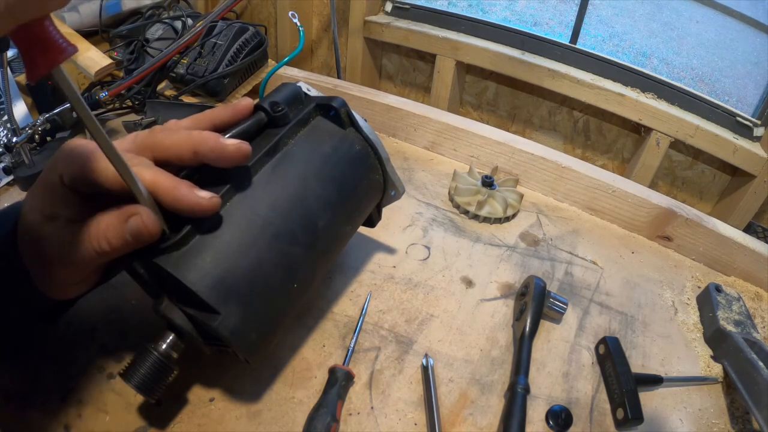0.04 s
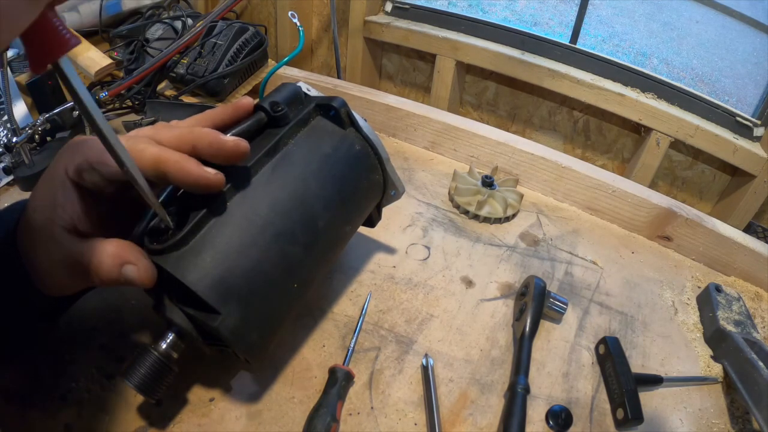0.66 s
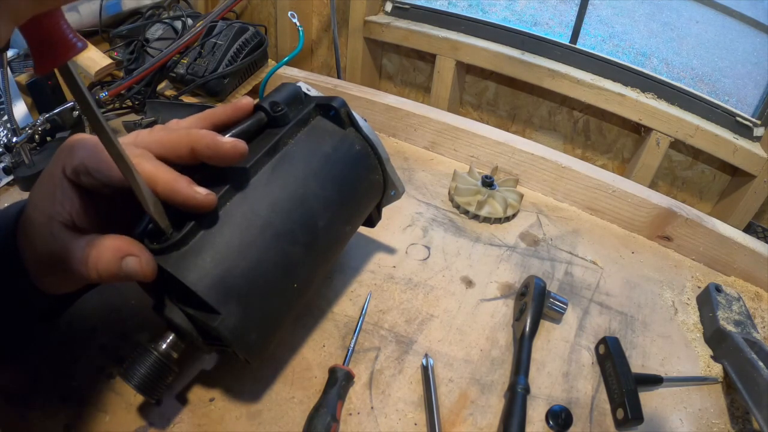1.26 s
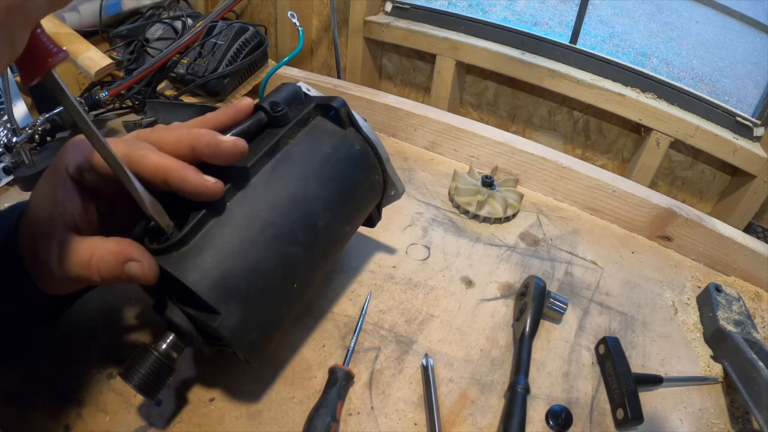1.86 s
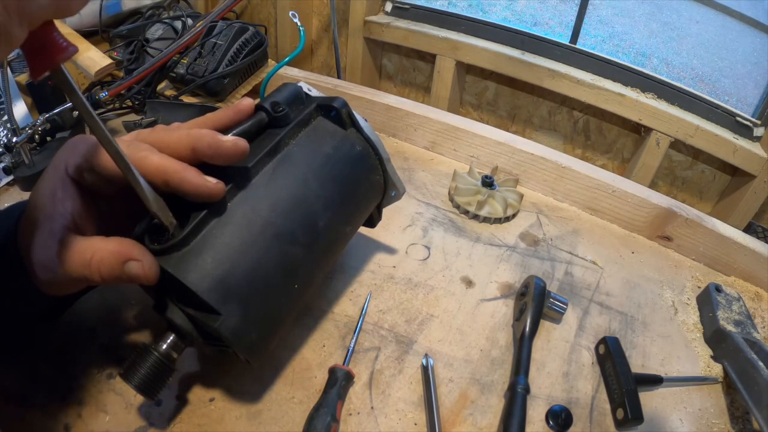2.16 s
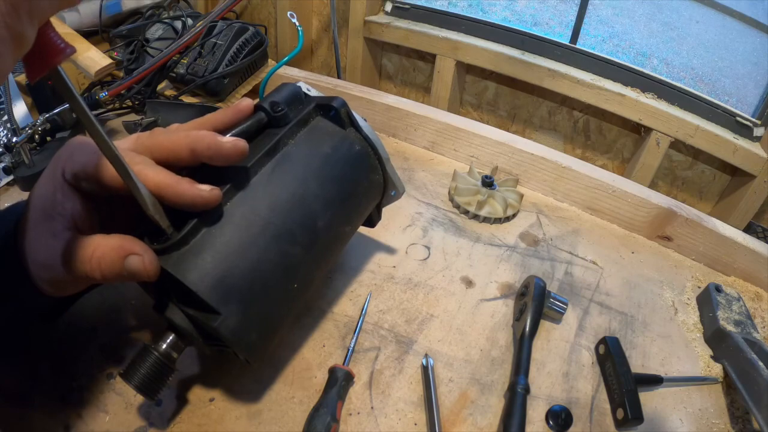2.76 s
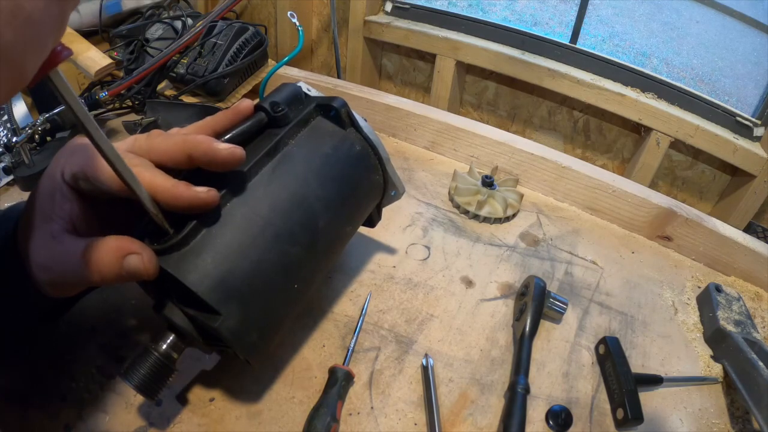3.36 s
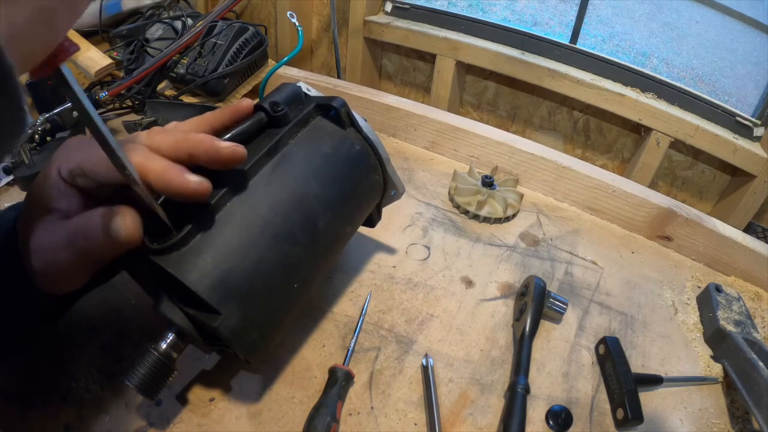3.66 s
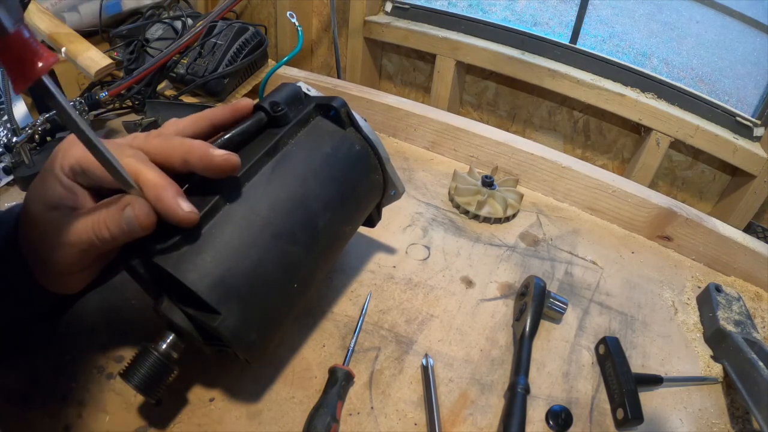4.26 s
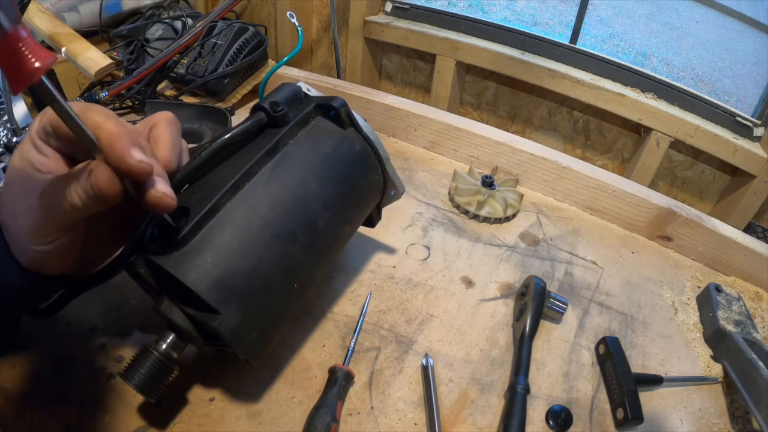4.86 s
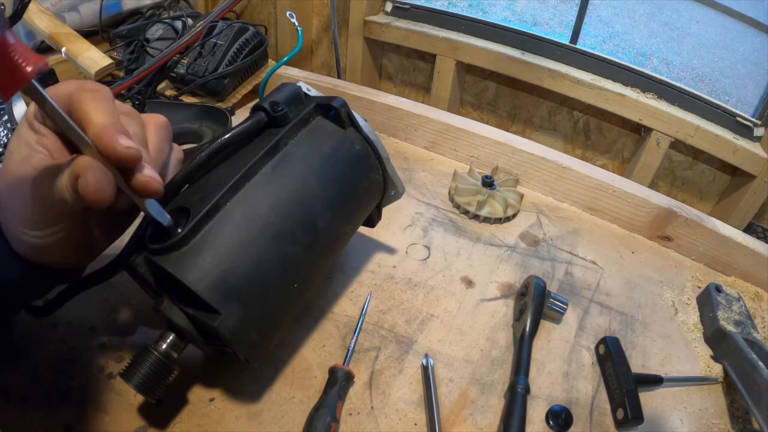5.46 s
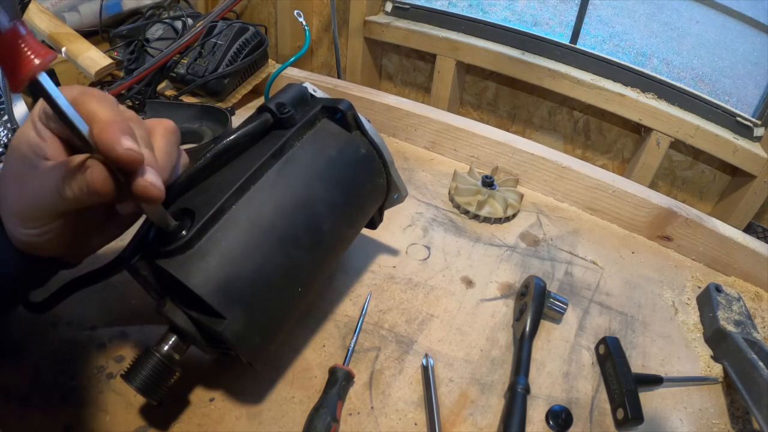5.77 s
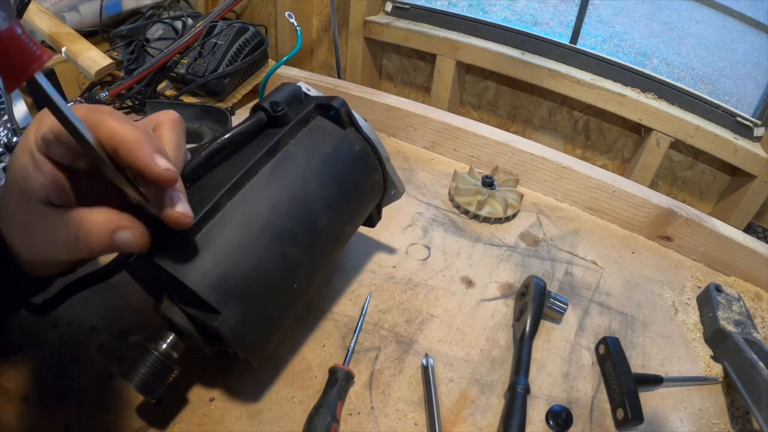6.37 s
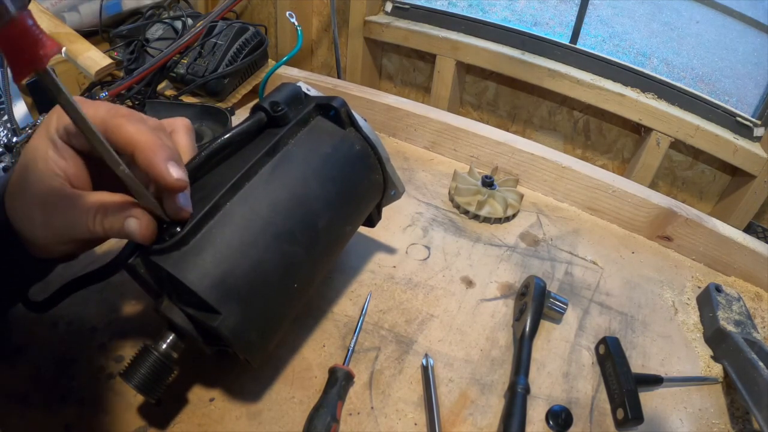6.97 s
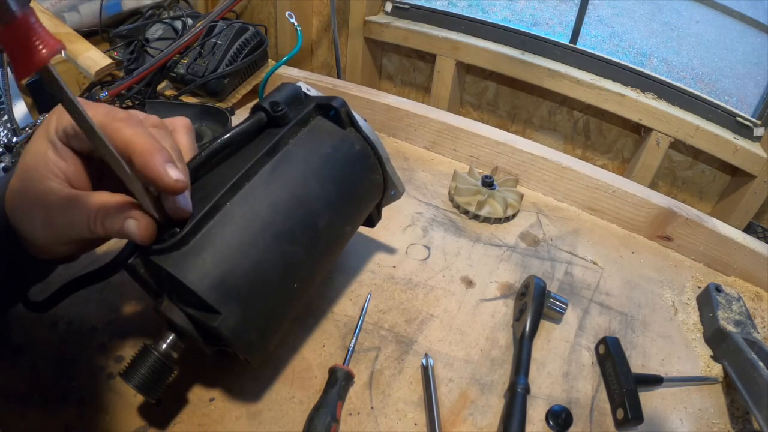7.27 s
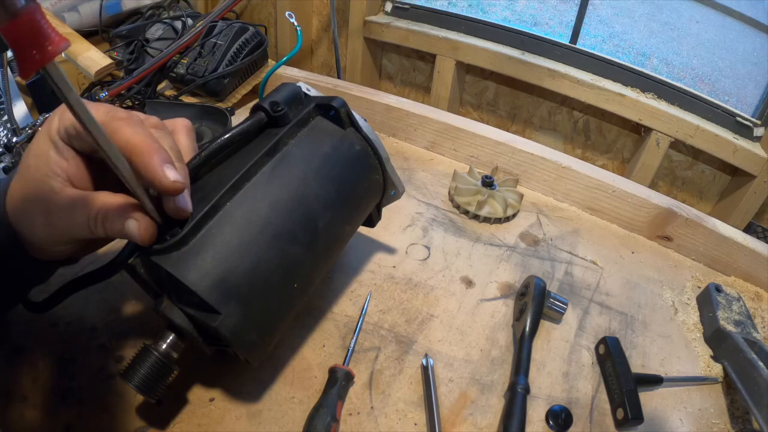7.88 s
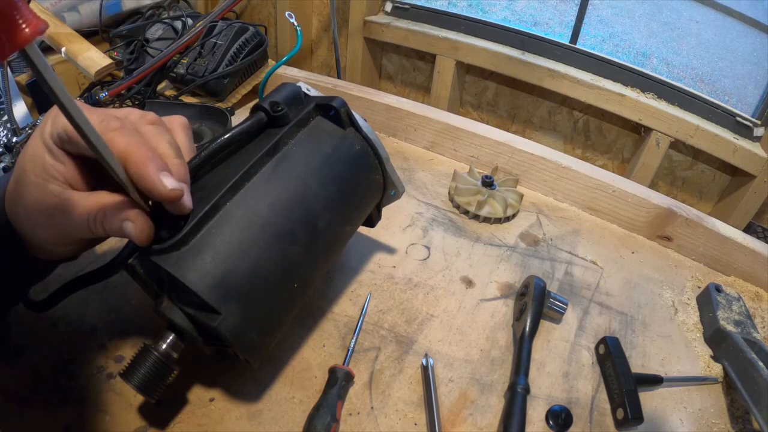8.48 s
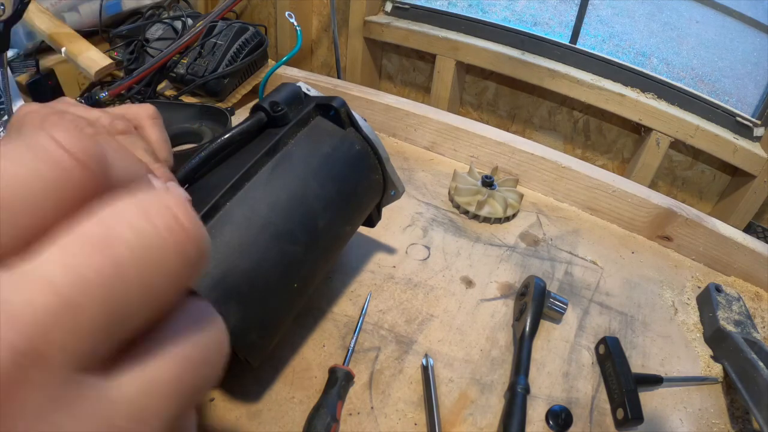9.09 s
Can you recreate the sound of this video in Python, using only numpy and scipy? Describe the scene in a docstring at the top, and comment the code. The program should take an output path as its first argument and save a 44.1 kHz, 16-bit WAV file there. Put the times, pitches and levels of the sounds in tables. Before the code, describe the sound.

A flat screwdriver turns a plastic cap in a motor casing, heard close by in a small, quiet shed. At 0.3 seconds the blade clicks sharply and the heavy motor thumps on the wooden bench. More clicks and dull bumps follow around 1.2 seconds, then a brief low groan of the casing on wood at 1.5. Clicks near 2 and 2.5 seconds surround a faint, thin squeak. The strongest click, with a low knock, lands at about 3.3 seconds. From 4 seconds the cap scrapes in short, dry, uneven strokes mixed with small clicks, busiest between 5 and 6, and it grinds briefly at 5.8 as it binds. A soft hand thud and bench rumble come at about 6.4 seconds. Separate scrapes and clicks continue roughly three times a second, with light bumps, growing fainter toward the end at about 9 seconds.

```python
"""A flat screwdriver works a plastic cap round in the casing of a motor lying on a wooden bench.
The blade clicks in and out of its slot, ringing cap, steel and casing. Tiny slips make the cap scrape
in short strokes; it squeaks once by stick-slip and grinds once where it binds. The hands jolt, bump and
lean on the heavy motor, which rumbles and groans on the wood. Heard close by in a small, quiet shed."""
import sys
import numpy as np
from scipy import signal
from scipy.fft import rfft, irfft
from scipy.io import wavfile
from scipy.ndimage import uniform_filter1d

SR = 44100
rng = np.random.default_rng(int(sys.argv[2]) if len(sys.argv) > 2 else 0)


def bounce(signal):
    """Save signal as a 16-bit WAV file at the path given by the first command-line argument."""
    frames = np.transpose(np.atleast_2d(signal))
    limited = np.clip(frames, -1, 1)
    pcm = np.round(limited * 32767).astype(np.int16)
    wavfile.write(sys.argv[1], SR, pcm)


N = 402633

# Modes of plastic cap, steel blade and motor casing. Each row: frequency in Hz, width in Hz, gain in dB.
CAP_RESONANCES = [(1061.6, 67, 19.5), (1182, 64, 6), (1370, 110, -0.5), (1979, 103, 10), (2490, 110, 4)]
BLADE_RESONANCES = [(2808, 240, 4.5), (4086, 180, 6), (4650, 200, 2.5), (5950, 440, 5.5), (7680, 160, 11)]
CASING_RESONANCES = [(169.3, 16, -3), (228, 23, 3.5), (292.3, 44, -5.5), (397.2, 46.3, -7.5)]
STROKE_RISE_DB_PER_S, STROKE_FALL_DB_PER_S = 599, 337.5


def from_db(db):
    """Decibels to gain."""
    return 10 ** (np.asarray(db) / 20)


def unit_rms(x):
    """x scaled to rms 1."""
    return x / np.sqrt(np.mean(x ** 2) + 1e-20)


def levelled(pair, window_s):
    """Mid/side pair with the mid's running rms held near 1."""
    size = int(window_s * SR)
    power = uniform_filter1d(uniform_filter1d(pair[0] ** 2, size), size)
    return pair / np.sqrt(np.abs(power) + 1e-20)


def tracks(rows):
    """Rows of time in seconds and values, interpolated to one track per value."""
    times_s, *columns = np.transpose(rows)
    return [np.interp(np.arange(N) / SR, times_s, column) for column in columns]


def drift(knots_per_s):
    """Random wander of rms 1."""
    knots = rng.standard_normal(N)
    return unit_rms(np.interp(np.arange(N) / SR * knots_per_s, np.arange(N), knots))


def swell(start_s, hold_s, rise_db_per_s=STROKE_RISE_DB_PER_S, fall_db_per_s=STROKE_FALL_DB_PER_S,
          fade_db=0):
    """Envelope: rises to 1 at start_s, loses fade_db over hold_s, then dies away."""
    lead_s, tail_s = 80 / rise_db_per_s, 80 / fall_db_per_s  # 80 dB each way
    span = np.arange(max(int((start_s - lead_s) * SR), 0), min(int((start_s + hold_s + tail_s) * SR), N))
    age_s = span / SR - start_s
    rise_db = rise_db_per_s * np.minimum(age_s, 0)
    droop_db = fade_db * np.clip(age_s / (hold_s + 1e-9), 0, 1)
    fall_db = fall_db_per_s * np.maximum(age_s - hold_s, 0)
    envelope = np.zeros(N)
    envelope[span] = from_db(rise_db - droop_db - fall_db)
    return envelope


def power_sum(events, resting_db):
    """Pairs of envelope and level in dB, added in power over a resting level."""
    return np.sqrt(from_db(resting_db) ** 2 + sum((from_db(db) * gain) ** 2 for gain, db in events))


def band(x, low_hz, high_hz):
    """Causal band-pass."""
    sos = signal.butter(2, [low_hz, min(high_hz, SR / 2 - 1)], "band", fs=SR, output="sos")
    return signal.sosfilt(sos, x)


def colour(x, spectrum, size=4096):
    """Minimum-phase filter through points of frequency in Hz and gain in dB; no pre-ring."""
    hz, db = np.transpose(spectrum)
    gain = from_db(np.interp(np.log(np.fft.rfftfreq(size, 1 / SR) + 1), np.log(hz), db))
    cepstrum = irfft(np.log(gain))[:size // 2]
    cepstrum[1:] *= 2
    response = irfft(np.exp(rfft(cepstrum, size)))
    return signal.fftconvolve(x, response[None], axes=1)[:, :x.shape[1]]


def resonance(x, hz, width_hz):
    """Two-pole resonator, peak gain 1."""
    radius = np.exp(-np.pi * width_hz / SR)
    feedback = [1, -2 * radius * np.cos(2 * np.pi * hz / SR), radius ** 2]
    return signal.lfilter(np.array([1, 0, -1]) * (1 - radius ** 2) / 2, feedback, x + 1e-18)


def gliding_resonance(x, hz, width_hz):
    """Resonator whose centre follows the track hz, peak gain 1."""
    phasor = np.exp(2j * np.pi * np.cumsum(hz) / SR)
    radius = np.exp(-np.pi * width_hz / SR)
    return 2 * np.real(phasor * signal.lfilter([1 - radius], [1, -radius], x / phasor + 1e-18))


def ringing(x, modes):
    """A body's modes driven by x, summed with alternating sign."""
    return sum((-1) ** k * from_db(db) * resonance(x, hz, width_hz)
               for k, (hz, width_hz, db) in enumerate(modes))


def peaked(x, modes):
    """x boosted or cut at each mode."""
    return x + sum((from_db(db) - 1) * resonance(x, hz, width_hz) for hz, width_hz, db in modes)


def slips(per_s):
    """Friction force: sparse random impulses, mid/side."""
    return (rng.random(N) < per_s / SR) * rng.standard_normal((2, N))


def crunch(slip_ms, size, give_ms=1.0):
    """Spectrally flat burst of tiny slips, drawn out by the give of the plastic; mid/side."""
    age = np.arange(size) / SR * 1000 / (slip_ms / 2 + give_ms)
    envelope = np.sqrt(age) * np.exp(-age)
    force = rng.standard_normal((2, size)) * envelope
    whitened = irfft(np.exp(1j * np.angle(rfft(force))))
    return whitened * envelope


def stick_slip(curve, waver=0.0032, ramp_s=0.01):
    """Gliding tone of two surfaces that stick and slip regularly."""
    hz, db = tracks(curve)
    t = np.arange(N) / SR
    gate = np.clip(np.minimum(t - curve[0][0], curve[-1][0] - t) / ramp_s, 0, 1)
    phase = 2 * np.pi * np.cumsum(hz * (1 + waver * drift(300))) / SR
    return gate * from_db(db) * np.sqrt(2) * np.sin(phase)


def still_air(level_db=-66.5):
    """Faint, diffuse hush of the shed; left/right."""
    # Each row: frequency in Hz, gain in dB.
    spectrum = [(20, -3), (65, 4.5), (200, -2), (660, -17), (1860, -20.5), (6900, -35), (15000, -50)]
    mid, side = from_db(level_db) * unit_rms(colour(rng.standard_normal((2, N)), spectrum))
    return mid + side * [[1], [-1]]


def cap_scrape(glide=0.028, wander_db=4.5, wander_per_s=25, judder_db=1.82, judder_per_s=90):
    """Tiny slips in uneven clumps shake cap and blade; the sharpest hiss."""
    # Pushes on the cap. Each row: start and length in seconds, level in dB, fade in dB, hiss re level in dB.
    strokes = [(0.014, 0.32, -73.5, -9, -4), (0.412, 0.037, -59.5, -5.5, -7), (1.115, 0.065, -65.5, 15, -7),
               (1.963, 0.014, -54.5, 28, -5.5), (2.085, 0.28, -72, 0.5, -18), (2.466, 0.044, -57, 15, -8),
               (2.877, 0.13, -68, -0.5, -6), (3.515, 0.24, -69.5, 14, -3.5), (3.77, 0.1, -56.5, 13, -5.5),
               (3.903, 0.12, -71.5, -8.5, -4.5), (4.1, 0.13, -50.5, -0.5, -6), (4.566, 0.09, -47.5, 14, -7),
               (4.671, 0.12, -56, 6, -5.5), (4.889, 0.11, -50.5, 16, -4.5), (5.012, 0.03, -46, 8, -4),
               (5.152, 0.17, -56.5, 1.5, -4), (5.411, 0.15, -53.5, -0.5, -5),
               (5.731, 0.21, -52, -4.5, -8.5), (5.95, 0.3, -58.5, -4.5, -7.5),
               (6.523, 0.15, -60.5, -8, -6.5), (6.959, 0.12, -54, 10.5, -3.5), (7.279, 0.11, -53, 0, -7.5),
               (7.646, 0.084, -50, 5.5, -8), (7.947, 0.15, -54.5, 7, -5), (8.309, 0.19, -57, 17, -4.5),
               (8.729, 0.041, -59, -1, -5), (8.948, 0.21, -70, 3, 0.5)]
    # Grip shifts the cap's modes. Each row: time in seconds, pitch ratio.
    grip_curve = [(5.2, 0.97), (6.6, 1.01), (7.02, 0.98), (7.68, 0.96), (8.03, 0.96)]
    # Friction spectra. Each row: frequency in Hz, gain in dB.
    rub_spectrum = [(200, -29.5), (850, -16.5), (1150, -1.5), (1600, 3.5), (2200, 4), (3300, 1),
                    (4300, -10.5), (8000, -52.5)]
    hiss_spectrum = [(1500, -32.5), (3700, -1.5), (6800, -3), (9000, -12.5), (13000, -24), (16000, -43)]
    rubs, hisses = [], []
    for start_s, length_s, db, fade_db, hiss_db in strokes:
        push = swell(start_s, length_s, fade_db=fade_db)
        rubs.append((push, db))
        hisses.append((push, db + hiss_db))
    force = slips(per_s=3000)
    grip, = tracks(grip_curve)
    shake = force.copy()
    # The contact point travels, so each mode wanders in pitch and level.
    for modes, share in [(CAP_RESONANCES, 1), (BLADE_RESONANCES, 0.21)]:
        for hz, width_hz, db in modes:
            ring = gliding_resonance(force, hz * grip * (1 + glide * drift(wander_per_s)), width_hz)
            shake += share * (from_db(db) - 1) * ring * from_db(wander_db * drift(wander_per_s))
    rub = power_sum(rubs, resting_db=-88) * levelled(colour(shake, rub_spectrum), window_s=0.17)
    hiss = power_sum(hisses, resting_db=-87) * levelled(colour(shake, hiss_spectrum), window_s=0.13)
    judder = unit_rms(from_db(judder_db * drift(judder_per_s)))
    return judder * (rub + hiss)


def blade_clicks(casing_db=-14.0, hollow_hz=730, hollow_width_hz=80, hollow_onset_db=-34.5, size=4096):
    """Short crunches ring cap and blade; dull ones also the casing, glancing ones the tip."""
    # Each row: start in seconds, level near 1 kHz in dB, clack (1.5-4 kHz) and snap (over 4 kHz)
    # in dB re that level, slip time in ms.
    contacts = [(0.039, -67, 5, -2.5, 3.9), (0.287, -63.5, 9, 7.5, 3.3), (0.293, -42.5, 4, 3, 3.1),
                (0.305, -40, -4, -10, 1.7), (0.4239, -55, 12, 1, 4.2), (0.43, -41.5, -6.5, -7, 4.4),
                (1.122, -72, 22, 1.5, 2.2), (1.152, -46.5, -12.5, -18, 2.3), (1.184, -49.5, -6, -23, 4.4),
                (1.237, -60, -2.5, -16, 5.9), (1.961, -41.5, -2.5, -27, 1.1), (2.464, -44, -3.5, -1, 4.2),
                (2.468, -45, -3, -11, 3.3), (2.885, -61.5, -25.5, -6, 2.3), (2.945, -53.5, -8, -17, 8.7),
                (3.335, -55, -8, -24, 4.3), (3.346, -29.5, -3.5, -21.5, 5.1), (3.644, -67.5, 6, 12.5, 0.46),
                (3.685, -58.5, 1, -3, 20), (3.801, -53, -14.5, -27, 0.75), (4.054, -48.5, 0, 0, 4.4),
                (4.547, -59, 0, -12, 5.7), (4.924, -51, 3.5, -32, 24), (5.015, -47, -3, -3, 12.3),
                (5.306, -55.5, 1, -14, 4.9), (5.434, -39.5, -7, -13, 21.2), (5.517, -43, -11, -8.5, 8.9),
                (5.751, -43.5, -0.5, -9, 3.8), (5.834, -45, 3, -15, 2), (5.923, -46, -12, -9, 29),
                (6.417, -60, -10.5, -13.5, 6.2), (6.541, -43.5, -8, -22, 0.94),
                (6.543, -43.5, -1.5, -12, 3.1), (6.67, -52, 4, -34, 2), (7.268, -52.5, 2, -11, 6.6),
                (7.495, -72, 10, -6.5, 3), (7.6147, -46, -3, -7.5, 2.7), (7.924, -71, 11, -5, 2.9),
                (7.937, -56, 8.5, -6.5, 1.9), (8.457, -69, 14.5, 14.5, 3.4), (8.728, -56.5, 7.5, 9, 8.4),
                (8.744, -56.5, -6, 2, 2.5), (8.783, -58, 2, 8.5, 1.3), (8.953, -55.5, -5.5, 6, 2.4)]
    # Prying strains the cap and raises its ring. Each row: time in seconds, pitch ratio.
    strain_curve = [(1.1, 1.025), (1.96, 1.15), (2.55, 1.02)]
    # Freely ringing tip. Each row: frequency in Hz, width in Hz, gain in dB.
    tip_modes = [(2750, 1400, -18), (3520, 110, 10), (7060, 170, 17.5), (9090, 300, 10)]
    # Impact spectrum. Each row: frequency in Hz, gain in dB.
    knock_spectrum = [(250, -19.5), (490, -24), (650, -8.5), (880, -12.5), (1700, -0.5), (3000, 3),
                      (6000, -8), (11000, -24.5), (16000, -41.5)]
    clicks = np.zeros((2, N + size))
    for start_s, db, clack_db, snap_db, slip_ms in contacts:
        force = crunch(slip_ms, size)
        strain = np.interp(start_s, *np.transpose(strain_curve))
        cap_modes = [(hz * strain, width_hz, gain_db) for hz, width_hz, gain_db in CAP_RESONANCES]
        ring = peaked(colour(force, knock_spectrum), cap_modes)
        ring = peaked(ring, BLADE_RESONANCES)
        hollow_db = 1.5 * max(db - hollow_onset_db, 0)  # a hard blow rings the hollow under the cap
        ring = peaked(ring, [(hollow_hz, hollow_width_hz, hollow_db)])
        if snap_db > max(clack_db, 0):
            ring = peaked(ring, tip_modes)
        # A soft face knocks, a hard edge snaps: three bands, each set by its energy.
        energy = np.abs(rfft(ring[0])) ** 2 * 2 / size
        bands = np.split(energy, np.array([600, 1500, 4000]) * size // SR)[1:]
        gains_db = db + np.array([0, clack_db, snap_db]) - 10 * np.log10([b.sum() for b in bands])
        ring = colour(ring, list(zip([1200, 2400, 5000], gains_db)))
        casing = ringing(force, CASING_RESONANCES)
        casing *= from_db(db + casing_db - clack_db) / np.linalg.norm(casing[0])
        onset = int(start_s * SR)
        clicks[:, onset:onset + size] += ring + casing
    return clicks[:, :N] * np.sqrt(0.02 * SR)  # levels are rms over 20 ms


def rumble(modes, top_hz):
    """Soft, uneven pushes of the hands ring low modes."""
    pushes = band(rng.standard_normal((2, N)), 12, top_hz)
    return levelled(ringing(pushes, modes), window_s=0.056)


def motor_rocking():
    """Jolts and leaning hands rock the motor: the bench rumbles, the casing drones."""
    # Each row: start in seconds, bench level in dB, casing level in dB.
    jolts = [(0.04, -59, -45), (0.298, -27, -33.5), (1.156, -41.5, -33.5), (1.197, -36, -40),
             (1.346, -52, -41), (2.473, -37, -44), (2.826, -50.5, -49.5), (3.259, -47, -46),
             (3.353, -28, -56), (3.728, -42, -49.5), (4.062, -54, -50), (4.948, -51.5, -46),
             (5.037, -67, -40), (5.167, -43, -44.5), (5.311, -46, -45.5), (5.451, -51, -46),
             (5.53, -65, -45), (5.783, -38.5, -34.5), (6.109, -36.5, -38.5), (6.368, -30.5, -38),
             (6.421, -36.5, -45.5), (6.546, -50, -42), (6.67, -66, -48), (7.272, -52, -39.5),
             (7.627, -44.5, -44.5), (7.957, -44, -41), (9.086, -68, -44)]
    # Each row: start and length in seconds, bench level in dB, casing level in dB.
    leans = [(0.181, 0.1, -50, -51), (1.125, 0.45, -50, -57.5), (2.014, 0.4, -63, -60.5),
             (2.873, 0.27, -53.5, -61.5), (3.133, 0.53, -48, -68), (4.032, 0.77, -61, -61.5),
             (5.16, 0.16, -51, -58), (5.74, 0.51, -46.5, -53.5), (6.39, 0.11, -60, -68),
             (6.986, 0.037, -46.5, -50.5), (7.957, 0.41, -59, -69.5)]
    # Each row: frequency in Hz, width in Hz, gain in dB.
    bench_modes = [(59.8, 12.7, 0.47), (79.1, 18.4, -1.6), (105.8, 11.7, 0.98)]
    bench, casing = [], []
    for start_s, bench_db, casing_db in jolts:
        bench.append((swell(start_s, 0, rise_db_per_s=1495, fall_db_per_s=173.5), bench_db))
        casing.append((swell(start_s, 0, rise_db_per_s=1495, fall_db_per_s=241), casing_db))
    for start_s, length_s, bench_db, casing_db in leans:
        weight = swell(start_s, length_s, rise_db_per_s=496, fall_db_per_s=268.5)
        bench.append((weight, bench_db))
        casing.append((weight, casing_db))
    bench_rumble = power_sum(bench, resting_db=-78) * rumble(bench_modes, top_hz=150)
    casing_drone = power_sum(casing, resting_db=-72.5) * rumble(CASING_RESONANCES, top_hz=395)
    return bench_rumble + casing_drone


def blade_chafe():
    """The flat of the blade slides on plastic: a thin rasp round one pitch per slide."""
    # Each row: start and length in seconds, pitch in Hz, width in Hz, level in dB.
    slides = [(1.274, 0.31, 2700, 500, -79), (2.074, 0.25, 1920, 200, -69), (2.108, 0.17, 3780, 1100, -72),
              (8.322, 0.031, 2840, 500, -58.5)]
    friction = rng.standard_normal((2, N))
    chafe = np.zeros((2, N))
    for start_s, length_s, hz, width_hz, db in slides:
        rasp = resonance(resonance(friction, hz, width_hz), hz, width_hz)
        chafe += from_db(db) * swell(start_s, length_s) * unit_rms(rasp)
    return chafe


def hand_bumps():
    """A soft hand hits the casing: dull thuds, no snap."""
    # Each row: start in seconds, level in dB.
    bumps = [(1.341, -40.5), (3.261, -50.5), (6.357, -39)]
    # Each row: frequency in Hz, gain in dB.
    thud_spectrum = [(100, -6), (380, 0), (550, -9.5), (1050, -14.5), (4000, -50)]
    push = sum(from_db(db) * swell(start_s, 0, rise_db_per_s=14000, fall_db_per_s=1400)
               for start_s, db in bumps)
    return push * levelled(colour(rng.standard_normal((2, N)), thud_spectrum), window_s=0.01)


def casing_groan():
    """The casing creeps on the wood: low stick-slip tone."""
    # Each row: time in seconds, pitch in Hz, level in dB.
    groan_curve = [(1.42, 181, -57), (1.52, 169.6, -45), (1.585, 206, -55)]
    return stick_slip(groan_curve)


def cap_squeak():
    """The blade sticks and slips on the cap: high tone."""
    # Each row: time in seconds, pitch in Hz, level in dB.
    squeak_curve = [(2.09, 5000, -82), (2.125, 5500, -59), (2.185, 5700, -67.5), (2.22, 5420, -62),
                    (2.255, 5060, -76)]
    return stick_slip(squeak_curve)


def cap_grind():
    """The cap binds under heavy pressure; coarse slips shake the hollow beneath it."""
    # Each row: start and length in seconds, level in dB.
    binds = [(5.76, 0.19, -52.5)]
    # Each row: frequency in Hz, gain in dB.
    grind_spectrum = [(150, -10), (400, 0), (1500, -3), (2100, -15), (9000, -45)]
    pressure = sum(from_db(db) * swell(start_s, length_s) for start_s, length_s, db in binds)
    return pressure * unit_rms(colour(slips(per_s=900), grind_spectrum))


def shed_echoes(pair, gap_s=0.005, size=16384):
    """Dense echoes of the mid signal off bench and wooden walls; treble dies first."""
    # Each row: band centre in Hz, 60 dB decay time in seconds, gain in dB.
    echo_bands = [(454, 0.11, -0.5), (1210, 0.24, -15), (2930, 0.12, -9.5), (7600, 0.075, -9)]
    t = np.arange(size) / SR
    response = np.zeros((2, size))
    for hz, t60_s, db in echo_bands:
        tail = rng.standard_normal((2, size)) * from_db(-60 * t / t60_s) * (t > gap_s)
        tail /= np.linalg.norm(tail[0])
        response += from_db(db) * band(tail, hz / np.sqrt(3), hz * np.sqrt(3))
    return signal.fftconvolve(pair[:1], response, axes=1)[:, :N]


def stereo(pair, left_over_right_db):
    """Mid/side to left/right: narrow bass, wide treble."""
    # Each row: frequency in Hz, side gain in dB.
    side_spectrum = [(60, -12.5), (1100, -12), (5000, -4.5)]
    side = colour(pair[1:], side_spectrum)
    balance = from_db([[left_over_right_db / 2], [-left_over_right_db / 2]])
    return (pair[0] + side * [[1], [-1]]) * balance


def scene():
    """Tool work with its echoes, the motor on the bench, and still air."""
    work = blade_clicks() + hand_bumps() + cap_squeak() + cap_scrape() + cap_grind() + blade_chafe()
    work += shed_echoes(work)
    motor = motor_rocking() + casing_groan()
    return stereo(work, left_over_right_db=1.6) + stereo(motor, left_over_right_db=-0.35) + still_air()


def record(dry):
    """Steep low-pass."""
    stop_hz, stop_db = 16400, 60
    return signal.sosfilt(signal.cheby2(14, stop_db, stop_hz, fs=SR, output="sos"), dry)


dry = scene()
out = record(dry)
bounce(out)
```